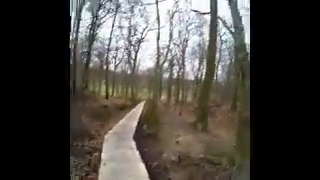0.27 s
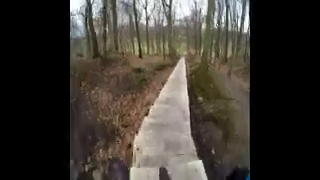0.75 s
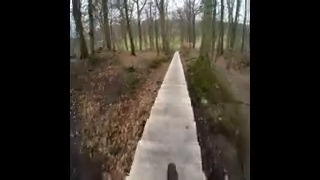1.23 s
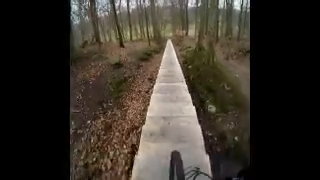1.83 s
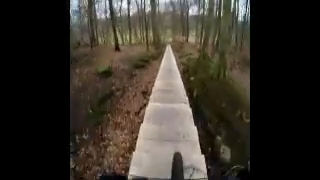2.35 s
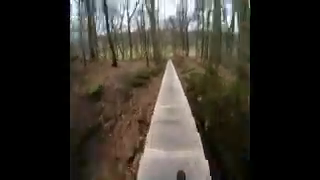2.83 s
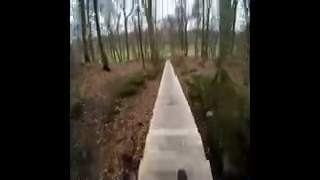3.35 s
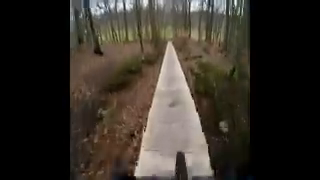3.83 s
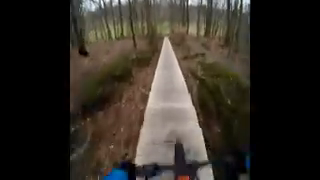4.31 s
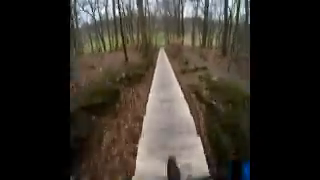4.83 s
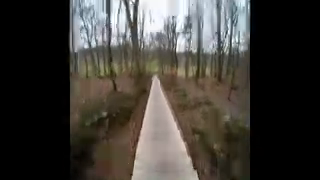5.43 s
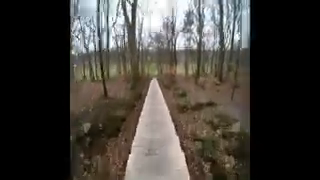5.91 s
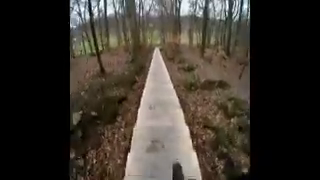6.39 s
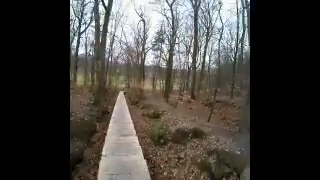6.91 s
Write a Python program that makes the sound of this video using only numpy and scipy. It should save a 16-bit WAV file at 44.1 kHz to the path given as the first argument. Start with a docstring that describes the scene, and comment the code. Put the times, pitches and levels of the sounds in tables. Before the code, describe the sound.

Knobbly bicycle tyres scrub and drum over wooden planks, with deep jolting thumps, ringing chain slaps, small ticks and two hard plastic clacks midway.

```python
"""A mountain bike rolls along a plank boardwalk, heard from a microphone on the rider.
From the start, knobbly tyres scrub and drum on the boards as filtered noise over a faint hiss, small parts
tick as damped tones, and about four bumps a second swing the bike low, with a chain slapping ringing steel.
Near 2.7 s a plastic mount clacks hard by the microphone, so loud that the limiter ducks the sound for a moment.
A second hard clack follows near 3.3 s; the bumps swing hardest from 3 to 6 s, and the rolling fades at the end."""
import sys
import numpy as np
from scipy import signal
from scipy.fft import rfft, irfft, next_fast_len
from scipy.io import wavfile
from scipy.ndimage import uniform_filter1d, minimum_filter1d, map_coordinates

SR = 44100
rng = np.random.default_rng(int(sys.argv[2]) if len(sys.argv) > 2 else 0)


def wrap_up_sound(samples):
    """Save the sound to the file named by the first command line argument, as 16-bit audio."""
    columns = np.atleast_2d(samples).T
    # keep every value between -1 and 1, then stretch to whole-number steps
    tamed = np.clip(columns, -1, 1)
    steps = np.round(tamed * 32767).astype(np.int16)
    wavfile.write(sys.argv[1], SR, steps)


N = 315315  # length in samples

# Levels in the tables are starting points: the functions below may trim or vary them.
# steady rolling: start_s, tyre_level_db, deck_level_db
ROLLING = [(0.0, -60, -49.5), (0.4, -59, -55.5), (1.17, -58.5, -50), (2.37, -56.5, -51), (2.55, -49, -48),
           (2.83, -60, -50), (3.5, -48.5, -46.5), (3.6, -50.5, -43.5), (5.14, -46, -46.5), (5.38, -56, -49),
           (6.05, -52.5, -44.5), (6.29, -48.5, -50.5), (6.49, -63.5, -50.5), (7.15, -65, -47.5)]
# bumps that heave the bike and press the tyres: middle_s, heave_db, swing_hz, scrub_db, half_length_s
BUMPS = [(0.135, -17, 25, -49.5, 0.049), (0.677, -17.5, 21, -44.5, 0.082), (1.106, -13, 25.8, -49, 0.023),
         (1.195, -20, 26, -47, 0.078), (1.472, -11, 28.5, -49, 0.031), (1.542, -15, 22, -48.5, 0.021),
         (1.843, -11.5, 28.8, -41.5, 0.051), (2.15, -8.5, 26, -56, 0.03), (2.433, -15, 31, -48, 0.08),
         (2.699, -16.5, 27, -46.5, 0.067), (3.001, -9.5, 21, -66, 0.075), (3.268, -8.5, 20.8, -46, 0.054),
         (3.523, -5.5, 32.6, -59, 0.035), (3.781, -7, 37.5, -59.5, 0.045), (3.977, -12, 26.5, -41, 0.04),
         (4.048, -8.5, 38, -43, 0.038), (4.233, -14, 26.6, -45, 0.023), (4.305, -7, 21.7, -52, 0.036),
         (4.558, -5.5, 23.2, -43, 0.042), (4.719, -21, 30, -57, 0.014), (4.809, -5.5, 23.5, -49, 0.03),
         (5.061, -7.5, 32, -44.5, 0.029), (5.143, -15, 43, -36, 0.025), (5.366, -7, 32, -42.5, 0.022),
         (5.568, -15, 30.3, -40, 0.017), (5.647, -11.5, 29.8, -42.5, 0.055), (5.944, -18.5, 27, -47, 0.048),
         (6.034, -8.5, 29.4, -40.5, 0.028), (6.438, -12, 29.3, -49.5, 0.043),
         (6.801, -13.5, 27.3, -41.5, 0.056)]
# scuffs of the tread on plank edges: start_s, level_db, length_s
SCUFFS = [(0.079, -39.5, .009), (.16, -45.5, 0.092), (0.62, -33, 0.0092), (0.659, -35, 0.0053),
          (0.801, -47, 0.012), (1.162, -41, 0.0059), (1.375, -31, .006), (1.394, -39.5, 0.024),
          (1.69, -38, 0.021), (1.89, -35, .012), (2.028, -44.5, 0.02), (2.471, -41.5, 0.044),
          (2.899, -41.5, 0.065), (3.04, -39.5, .06), (3.162, -50, 0.069), (3.443, -36.5, 0.053),
          (3.57, -38, 0.073), (4.261, -37, 0.026), (4.425, -48, 0.015), (4.485, -44, 0.046),
          (4.61, -41.5, 0.062), (4.79, -35.5, 0.014), (5.006, -35.5, 0.015), (5.268, -38.5, 0.026),
          (5.357, -39.5, 0.011), (5.554, -38, 0.014), (5.678, -41, 0.053), (5.848, -42, 0.021),
          (6.023, -35.5, 0.013), (6.142, -40.5, 0.047), (6.8, -44, 0.089), (6.953, -48, .03)]
# loose boards knocking on their bearers: start_s, level_db
KNOCKS = [(2.616, -21), (2.727, -7), (3.061, -20.5), (3.275, -20.5), (3.604, -17), (4.8, -19.5),
          (5.135, -22), (5.36, -20), (5.562, -24), (5.848, -22), (5.868, -22), (6.026, -19.5), (6.068, -28)]
# chain slaps: start_s, clash_db, ring_db
SLAPS = [(.078, -50.5, -51), (0.575, -33, -33.5), (0.843, -42, -64), (1.025, -31.5, -33),
         (2.089, -35.5, -41), (2.361, -31, -32.5), (2.426, -47.5, -68), (2.613, -28.5, -34.5),
         (2.685, -43.5, -60), (2.897, -41.5, -48.5), (3.156, -34.5, -45), (3.244, -42.5, -62),
         (3.42, -35, -40), (3.680, -31, -32.5), (3.750, -42.5, -62), (3.942, -32, -41), (4.197, -31.5, -36),
         (4.268, -35, -59), (4.444, -28, -37), (4.514, -32, -55), (4.697, -32, -26), (4.766, -35, -49),
         (4.969, -28, -28), (5.037, -42.5, -60), (5.26, -43, -53), (5.556, -35.5, -61), (5.927, -32.5, -28),
         (6.346, -33.5, -45), (6.423, -42, -53), (6.760, -34.5, -44), (6.820, -35.5, -42)]
# clacks of the plastic mount: start_s, level_db, contact_s
CLACKS = [(1.377, -28.5, 0.00066), (2.7246, 11.5, 0.00037), (2.97, -21.5, 0.001), (3.266, -19, 0.0035),
          (3.273, 0.5, 0.0023), (3.515, -21.5, 0.00085), (5.847, -27.5, 0.0019), (5.862, -26.5, 0.0016),
          (6.063, -21, 0.0019)]
# clearest ticks of cables and fittings: start_s, level_db
TICKS = [(.373, -33.5), (.736, -31.5), (1.233, -35), (1.874, -32), (2.256, -33.5), (2.506, -25),
         (3.060, -30), (3.994, -29.5), (4.488, -29), (5.496, -34), (5.509, -28), (5.716, -29), (5.749, -31),
         (6.023, -38), (6.042, -26.5), (6.065, -32), (6.832, -25.5), (6.845, -29), (6.974, -31.5)]
# short whirrs of the freewheel: middle_s, half_length_s, pitch_hz, level_db
WHIRRS = [(.17, 0.074, 2630, -54), (1.226, 0.041, 3100, -55), (3.86, 0.2, 3000, -56.5),
          (3.87, 0.057, 2210, -60), (4.887, 0.081, 2090, -53.5), (5.17, 0.048, 2120, -51)]

# Ringing tones of each object: pitch_hz, level_db, t60_s (time to fade by 60 dB)
# the deck when thumped
THUD_TONES = [(76, -10, 0.12), (136, 0.5, .07), (170, -2.5, 0.044), (246, -5, 0.077), (323, -8.5, 0.046),
              (448, -6, 0.047), (546, -12.5, 0.067), (728, -12, 0.11)]
# a loose board
BOARD_TONES = [(88, 4, 0.077), (146, -4, 0.08), (198, -3, 0.081), (272, -14, 0.098), (764, -12, 0.046)]
# the steel that the chain hits
STEEL_TONES = [(5000, -10, 0.065), (5100, -35.5, .08), (6080, -14, 0.093), (6084, 4.5, 0.11),
               (7180, -1, 0.051), (8500, -40, 0.084), (9800, -28, .05)]
# the plastic mount
MOUNT_TONES = [(555, -31, 0.073), (680, -22.5, .02), (818, -15.5, 0.02), (990, -16.5, .012),
               (1290, -9.5, 0.022), (1593, 1.5, 0.022), (1749, 4.5, 0.019), (1880, -35.5, 0.14),
               (2410, -2.5, 0.023), (2766, -10.5, 0.034), (3383, -7, 0.022), (3890, -5, 0.0075),
               (4130, -3.5, 0.0066), (4970, -11.5, 0.015), (5900, -16, 0.01)]
# cables and small fittings
FITTING_TONES = [(1700, 0.5, 0.0083), (3510, -20.5, 0.033), (5390, -4, 0.029), (5830, -0.5, 0.012),
                 (6180, -4, 0.018), (10200, -22, 0.0044)]

# Colours of the noises: frequency_hz, level_db (per Hz, relative)
# tread on the boards
TREAD_COLOUR = [(400, -28), (750, -2.5), (1000, -6), (1600, 5), (2200, 1.5), (2650, -2.5), (3200, 0),
                (4300, -11.5), (5800, -4.5), (6500, -15), (7600, -24.5), (11000, -29.5), (16000, -53.5)]
# drumming planks
PLANK_COLOUR = [(40, -8.5), (70, 11), (110, 4), (160, -0.5), (220, 0), (310, -8), (550, -13.5),
                (730, -11.5), (950, -27), (1500, -23.5), (3000, -71.5)]
# low sway of the bike
SWAY_COLOUR = [(8, -14), (18, -3.5), (38, -10.5), (47, -5), (60, -21), (100, -43.5), (200, -79)]
# chain links clashing on steel
CLASH_COLOUR = [(600, -28), (1100, -8), (1600, -2), (2300, -5.5), (3300, -2), (4800, 1.5), (5500, -5),
                (6200, 5.5), (7100, -6.5), (8100, -13), (10200, -10), (12000, -28.5), (15500, -31.5)]
# chain links jingling on each other
JINGLE_COLOUR = [(3000, -24.5), (6000, -0.5), (7500, -3.5), (8500, 2.5), (10200, -1.5), (12000, -9),
                 (14000, -6), (15500, -15)]
# the crack at the moment of contact
CRACK_COLOUR = [(200, -14.5), (800, -0.5), (1700, 1.5), (3000, -16), (5800, -5.5), (7000, -1.5), (9500, 0),
                (10500, -20.5), (15000, -23)]
# the mount chattering to rest
CHATTER_COLOUR = [(300, -10), (800, -8), (1050, -8), (1400, -15), (1650, -2), (2100, -7), (2450, -14),
                  (2900, -7), (3800, -14.5), (5800, -13), (6800, -28), (10000, -46)]
# the steady hiss
HISS_COLOUR = [(30, 12), (200, 4), (720, 6), (1100, -1), (2800, -2.5), (3150, -0.5), (3600, -9),
               (4700, -6.5), (5050, -2.5), (5500, -4), (7500, -14), (9600, -17.5), (10100, -4),
               (10900, -20), (13000, -23), (15000, -15.5)]

TOP_HZ = 15600  # nothing above this is kept
DRUM_DB, DRUM_GROWS = -30, 0.71  # deck drumming at a heave of 0 dB; dB gained per dB of heave
REBOUND_S, REBOUND_HALF_S, REBOUND_DB = 0.079, 0.027, -5  # light moment after a bump: delay, half length, dip
SCUFF_RISE = 0.22  # how fast a scuff bites, as a share of its length


def tyres(press, scuffs):
    """Tread blocks patter on the gritty boards, in clumps as the load shifts, and scuff on plank edges."""
    load = press * amp(2.66 * wobble(70)) + scuffs
    contact = patter(rate=1500, spread_db=2.5) + rng.standard_normal(N)
    # brief patches colour the block strikes; longer ones tint the scrub from board to board
    blocks = patchy(contact, depth_db=4.2, rows=5, frames=3.5)
    boards = patchy(blocks, depth_db=2.6, rows=1.5, frames=40)
    return load * coloured(boards, TREAD_COLOUR)


def tyre_load(rolling_db=-1, scrub_db=-1, lead_s=0.0084):
    """How hard the tread scrubs: steady rolling, a squeeze on each bump and a light moment on the rebound."""
    rebound = sum(hump(s + REBOUND_S, REBOUND_HALF_S) for s, *_ in BUMPS)
    rolling_level = curve([(s, db) for s, db, _ in ROLLING]) + rolling_db
    rolling = amp(rolling_level + REBOUND_DB * rebound)
    squeeze = sum(amp(db + scrub_db) * hump(s - lead_s, half) for s, _, _, db, half in BUMPS)
    return np.hypot(rolling, squeeze)


def scuffing():
    """How loud the scuffs are: the tread bites on a plank edge and slides off it."""
    out, t = np.zeros(N), np.arange(SR // 4) / SR
    for s, db, length in SCUFFS:
        bite = 1 - np.exp(-t / (SCUFF_RISE * length))
        slide_off = np.exp(-(t / length) ** 2)
        add(out, s, amp(db) * bite * slide_off)
    return out


def grit(press, count=260, size_db=5.5, spread_db=4.0, grain_hz=3600, cycles=7):
    """Crumbs of grit snap under the tyres, each at its own pitch, louder when the tyres press harder."""
    out, t = np.zeros(N), np.arange(SR // 50) / SR
    for at, (pitch, size) in zip(rng.integers(0, N, count), rng.standard_normal((count, 2))):
        hz = np.clip(grain_hz * np.exp(.4 * pitch), 1200, 6200)
        snap = np.sin(2 * np.pi * hz * t) * np.exp(-np.pi * hz * t / cycles)
        add(out, at / SR, press[at] * amp(size_db + spread_db * size) * snap)
    return out


def deck(shake, scuffs, scuff_db=-3, thud_db=-21, thud_grows=1.36, lead_s=.012, jolt_db=-3):
    """The wheels drum on the planks; bumps and the jolts that fling the chain thud, and loose boards knock."""
    impacts = patter(rate=220, spread_db=3.5) + 0.79 * rng.standard_normal(N)
    blows = patchy(impacts, depth_db=3.5, rows=1.2, frames=16)
    load = np.hypot(shake * amp(1.67 * wobble(45)), scuffs * amp(scuff_db))
    drumming = load * coloured(blows, PLANK_COLOUR)
    bump_jolts = [(s - lead_s, thud_grows * db + thud_db) for s, db, *_ in BUMPS]
    chain_jolts = [(s, db + jolt_db) for s, db, _ in SLAPS]
    thuds = struck(bump_jolts + chain_jolts, THUD_TONES, crack_db=-34, crack_t60=.02, vary_db=5.5)
    knocks = struck(KNOCKS, BOARD_TONES, crack_db=-40, crack_t60=.01, vary_db=3.5)
    return drumming + thuds + knocks


def deck_load(rolling_db=2.0, lead_s=0.0023, spread=1.25):
    """How hard the deck is shaken: steady rolling plus a swell that grows with the heave of each bump."""
    rolling = amp(curve([(s, db) for s, _, db in ROLLING]) + rolling_db)
    swells = sum(amp(DRUM_DB + DRUM_GROWS * db) * hump(s - lead_s, spread * half)
                 for s, db, _, _, half in BUMPS)
    return np.hypot(rolling, swells)


def heave(shake, width_s=0.022, bottoming=.3, sway_db=15):
    """Each bump swings bike and rider briefly, over a steady low sway that grows with the drumming."""
    out, t = np.zeros(N), np.arange(-SR // 8, SR // 8) / SR
    for s, db, hz, *_ in BUMPS:
        swing = np.cos(2 * np.pi * hz * t) / np.cosh(t / width_s) ** 0.93
        add(out, s + t[0], amp(db) * swing)
    # the suspension stiffens on big swings, which adds a higher thud
    out = out + bottoming * filtered(out ** 2, lambda hz: hz ** 2 / (hz ** 2 + 40 ** 2))
    return out + shake * amp(sway_db) * coloured(rng.standard_normal(N), SWAY_COLOUR)


def chain(land_s=0.0036, clash_t60=0.074, swell_s=.005, bite_s=0.0012, jingle_db=-11):
    """Links land one after another in a short clash, and the steel they hit rings on."""
    clash, loose, steel, t = np.zeros(N), np.zeros(N), np.zeros(N), np.arange(SR // 4) / SR
    landing = (1 - np.exp(-t / bite_s)) * amp(-60 * np.maximum(t - land_s, 0) / clash_t60)
    for (s, clash_db, ring_db), chance in zip(SLAPS, rng.standard_normal(len(SLAPS))):
        add(clash, s, amp(clash_db - 2.0) * landing)
        miss = np.clip((clash_db - ring_db) / 20, 0, 1)  # a slap that misses the steel jingles link on link
        add(loose, s, miss * amp(clash_db + jingle_db) * landing)
        stretch = 1 + .004 * chance  # the chain loads the steel a little differently each time
        ringing = ring(STEEL_TONES, t * stretch, vary_db=5)
        add(steel, s, amp(ring_db + 7.0) * (1 - np.exp(-t / swell_s)) * ringing)
    impacts = patter(rate=3500, spread_db=0.5) + 0.84 * rng.standard_normal(N)
    links = patchy(impacts, depth_db=1.0, rows=3.98, frames=4)
    jingle = loose * coloured(patter(rate=4400, spread_db=7.0), JINGLE_COLOUR)
    # links buzzing against the steel roughen its ring
    buzz = amp(2.6 * wobble(130)) * (1 + 0.24 * wobble(770))
    return clash * coloured(links, CLASH_COLOUR) + jingle + steel * buzz


def mount(chatter_db=-12, chatter_t60=0.024, crack_db=-12, hard_contact_s=0.00036):
    """The mount clacks and chatters to rest; a shorter, harder contact cracks more brightly."""
    body, settling, cracks, t = np.zeros(N), np.zeros(N), np.zeros(N), np.arange(SR // 5) / SR
    for s, db, contact in CLACKS:
        blow = amp(db) * (1 - np.exp(-(t / contact) ** 2))
        add(body, s, blow * ring(MOUNT_TONES, t, vary_db=0.7))
        add(settling, s, blow * amp(chatter_db - 60 * t / chatter_t60))
        add(cracks, s, blow * amp(crack_db - 60 * t / 0.0049) / (1 + contact / hard_contact_s))
    chatter = settling * coloured(rng.standard_normal(N), CHATTER_COLOUR)
    return body + chatter + cracks * coloured(rng.standard_normal(N), CRACK_COLOUR)


def fittings(count=20, light_db=-41, spread_db=3.0):
    """Cables and small fittings tick, a little differently each time, with lighter ticks at random times."""
    light = [(rng.random() * N / SR, light_db + spread_db * rng.standard_normal()) for _ in range(count)]
    return struck(TICKS + light, FITTING_TONES, crack_db=-18, crack_t60=.018, vary_db=4)


def freewheel(width_hz=260):
    """Fast pawl clicks blur into faint, narrow whirrs."""
    out, t = np.zeros(N), np.arange(N) / SR
    for s, half, hz, db in WHIRRS:
        clicks = patter(rate=700, spread_db=2.0)
        band = filtered(clicks, lambda f: 1 / (1 + (2 * (f - hz) / width_hz) ** 2))
        out += amp(db) * np.exp(-((t - s) / half) ** 4) * unit(band)
    return out


def background_hiss():
    """A faint steady noise whose colour shifts in small patches."""
    noise = patchy(rng.standard_normal(N), depth_db=2.5, rows=1.5, frames=8)
    return amp(-56.5) * coloured(noise, HISS_COLOUR)


def struck(blows, modes, crack_db, crack_t60, vary_db):
    """Each blow is a short contact crack plus the ringing of the object."""
    out, cracks, t = np.zeros(N), np.zeros(N), np.arange(SR // 4) / SR
    for s, db in blows:
        add(out, s, amp(db) * ring(modes, t, vary_db))
        add(cracks, s, amp(db + crack_db - 60 * t / crack_t60))
    return out + cracks * coloured(rng.standard_normal(N), CRACK_COLOUR)


def ring(modes, t, vary_db):
    """Fading tones of one blow, each at a slightly new strength, with peak 1."""
    x = np.zeros(len(t))
    for k, (hz, db, t60) in enumerate(modes):
        strength = amp(db + vary_db * rng.standard_normal() - 60 * t / t60)
        x += (-1) ** k * strength * np.sin(2 * np.pi * hz * t)
    return x / np.abs(x).max()


def patter(rate, spread_db):
    """Random tiny impacts of uneven size, rate a second, at rms 1."""
    hits = rng.random(N) < rate / SR
    return unit(hits * rng.standard_normal(N) * amp(spread_db * rng.standard_normal(N)))


def patchy(x, depth_db, rows, frames):
    """Random gain patches, about rows bands (172 Hz) by frames steps (2.9 ms), keep the colour changing."""
    z = signal.stft(x, nperseg=256)[2]
    grid = np.meshgrid(np.arange(z.shape[0]) / rows, np.arange(z.shape[1]) / frames, indexing="ij")
    field = map_coordinates(rng.standard_normal(z.shape), grid, mode="wrap")
    return unit(signal.istft(z * amp(depth_db * field), nperseg=256)[1][:N])


def coloured(x, spectrum):
    """x shaped by (Hz, dB) points, at rms 1."""
    f, db = np.transpose(spectrum)
    return unit(filtered(x, lambda hz: amp(np.interp(np.log(hz + 1), np.log(f), db))))


def filtered(x, response):
    """x with each frequency scaled by response(hz)."""
    m = next_fast_len(N + 8192)  # spare room so the end does not wrap onto the start
    return irfft(rfft(x, m) * response(np.fft.rfftfreq(m, 1 / SR)), m)[:N]


def wobble(rate):
    """A smooth random curve, rate random points a second."""
    return map_coordinates(rng.standard_normal(int(N * rate / SR) + 4), [np.arange(N) * rate / SR])


def curve(rows):
    """One value per sample from (s, value) rows, joined by straight lines."""
    return np.interp(np.arange(N) / SR, *np.transpose(rows))


def hump(s, half):
    """A smooth rise and fall of height 1 around time s."""
    return np.exp(-np.minimum(((np.arange(N) / SR - s) / half) ** 2, 50))


def add(track, s, sound):
    """Mix a sound into the track at time s."""
    part = track[max(round(s * SR), 0):][:len(sound)]
    part += sound[:len(part)]


def amp(db):
    """Decibels to gain."""
    return 10 ** (np.asarray(db) / 20)


def unit(x):
    """Scale to rms 1 (average strength)."""
    return x / np.sqrt(np.mean(x ** 2) + 1e-20)


def scene():
    """The bike on the boards over a faint steady hiss."""
    press, shake, scuffs = tyre_load(), deck_load(), scuffing()
    boards = tyres(press, scuffs) + grit(press) + deck(shake, scuffs)
    bike = heave(shake) + chain() + mount() + fittings() + freewheel()
    return (boards + bike + background_hiss())[None]


def limiter(x, ceiling_db, release_db):
    """Peaks over the ceiling pull the gain down just ahead of them; it climbs back by release_db a second."""
    over = np.maximum(20 * np.log10(np.abs(x) + 1e-9) - ceiling_db, 0)
    climb = release_db * np.arange(N) / SR
    gain_db = climb - np.maximum.accumulate(over + climb)
    # about 1 ms of early warning and smoothing
    return x * amp(uniform_filter1d(minimum_filter1d(gain_db, size=45), size=45))


def record(dry):
    """Loud peaks are limited, and nothing above the top frequency is kept."""
    held = limiter(dry[0], ceiling_db=1.5, release_db=10.0)
    return filtered(held, lambda hz: hz < TOP_HZ)[None]


dry = scene()
out = record(dry)
wrap_up_sound(out)
```